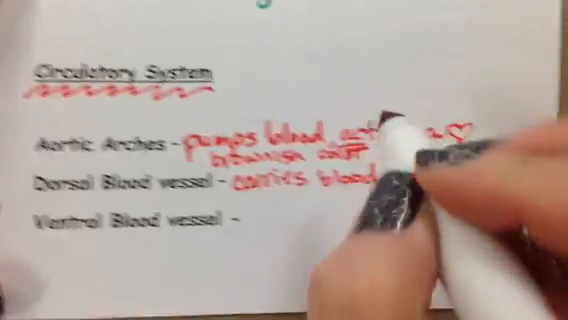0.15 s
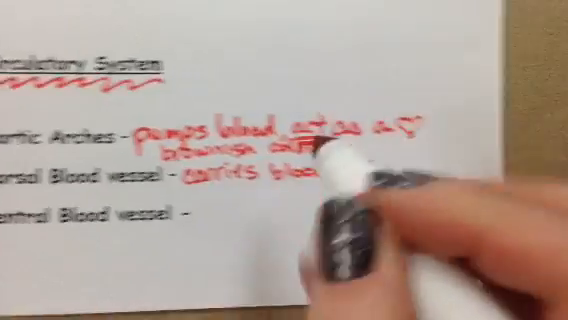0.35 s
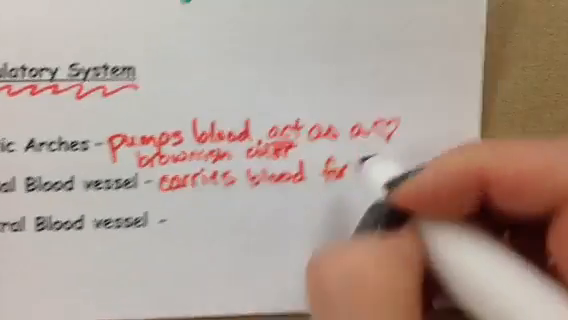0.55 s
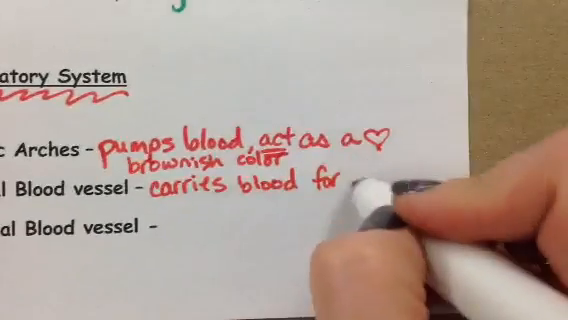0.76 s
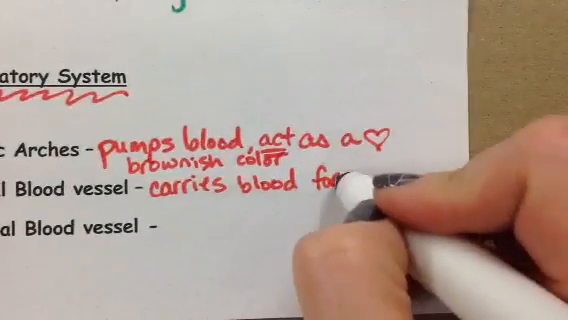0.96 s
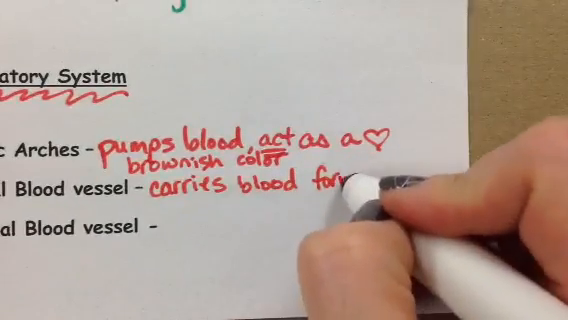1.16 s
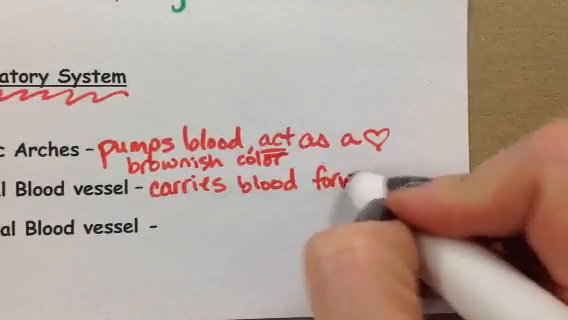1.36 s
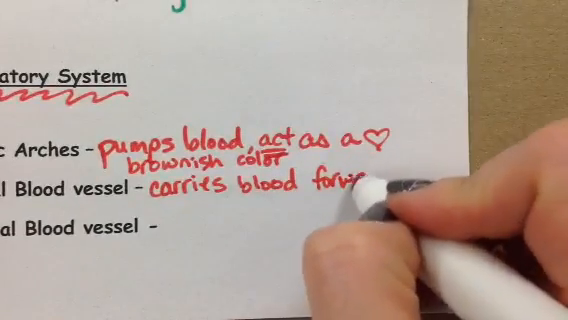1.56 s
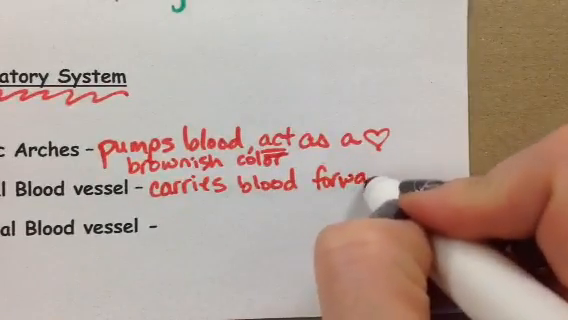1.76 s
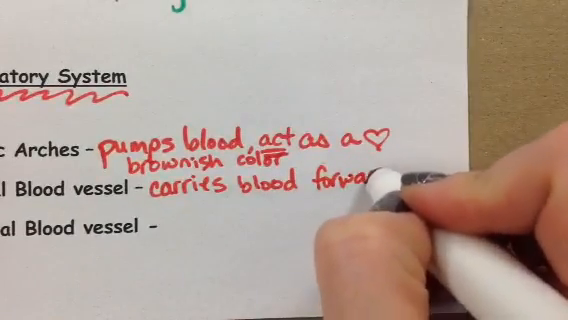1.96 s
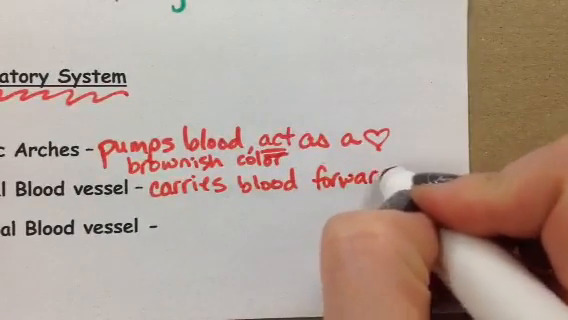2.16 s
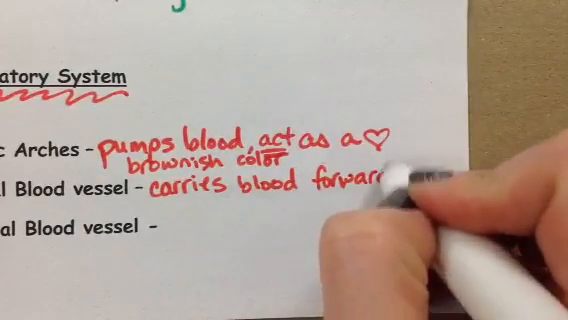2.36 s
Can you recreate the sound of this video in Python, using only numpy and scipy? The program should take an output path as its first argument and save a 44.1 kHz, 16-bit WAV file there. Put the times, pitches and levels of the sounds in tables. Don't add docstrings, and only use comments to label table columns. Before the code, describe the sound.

A felt marker writes on paper in short, dry scratches and small hollow taps, after the sheet is shoved over the desk with rustling and crackles; close phone microphone, quiet room, faint low fan hum.

```python
import sys
import numpy as np
from scipy import signal
from scipy.fft import rfft, irfft
from scipy.io import wavfile
from scipy.ndimage import uniform_filter1d

SR = 44100
rng = np.random.default_rng(int(sys.argv[2]) if len(sys.argv) > 2 else 0)


def materialize(psi):
    bounded = np.clip(np.atleast_2d(psi).T, -1, 1)
    quanta = np.round(bounded * 32767).astype(np.int16)
    wavfile.write(sys.argv[1], SR, quanta)


def natural_amplitude(level_db):
    exponent = np.asarray(level_db, float) / 20
    return 10 ** exponent


N = 110250
T = np.arange(N) / SR


def unit(x):
    return x / np.sqrt(np.mean(x ** 2))


def colour(x, points):
    hz, db = np.array(points).T
    f = np.arange(N // 2 + 1) * SR / N + 1
    curve_db = np.interp(np.log(f), np.log(hz), db, left=-90)
    return unit(irfft(rfft(x) * natural_amplitude(curve_db), N))


def ring(x, hz, width):
    return signal.lfilter(*signal.iirpeak(min(hz, 0.45 * SR), hz / width, SR), x)


def steep_ring(x, hz, width):
    return unit(ring(ring(x, hz, width), hz, 2 * width))


def walk(rate):
    k = int(SR / rate)
    steps = np.repeat(rng.standard_normal(N // k + 1), k)
    return unit(uniform_filter1d(steps, k)[:N])


def body(x, modes, wander_db=2.5):
    return unit(sum(natural_amplitude(db + wander_db * walk(25.4)) * steep_ring(x, hz, width) for hz, width, db in modes))


def grains(rate, scatter_db):
    size = natural_amplitude(scatter_db * rng.exponential(size=N)) * rng.standard_normal(N)
    return unit(size * (rng.random(N) < rate / SR))


def fibres():
    return grains(20000, -0.13)


def swell(at, rise, fall):
    return np.exp(-0.5 * ((T - at) / np.where(T < at, rise, fall)) ** 2)


def knocks(rows):
    out = np.zeros(N + 2048)
    t = T[:2048]
    for at, db, hz, t60 in rows:
        attack = np.minimum(t * hz / 1.42, 1)
        fade = attack * np.exp(-np.log(1000) * t / t60) * (1 - (t / t[-1]) ** 4)
        noise = ring(rng.standard_normal(2048), hz, 0.5 * hz)
        burst = fade * (np.sin(2 * np.pi * hz * t) + (hz / 4000) ** 2 * noise)
        start = int(at * SR)
        out[start:start + 2048] += natural_amplitude(db) * burst / np.abs(burst).max()
    return out[:N]


# f/Hz, level/dB
MAINS_TONES = [(120, -78), (239.5, -72.5), (359.5, -83)]
# f/Hz, width/Hz, level/dB
FAN_BANDS = [(117.7, 32, -81), (153.5, 14, -83), (176.6, 20, -84), (201, 22.6, -70.5), (240, 37, -75),
             (292, 16, -84.5), (621, 42, -82.5)]


def fan():
    tones = sum(natural_amplitude(db + 2) * np.sin(2 * np.pi * (hz * T + rng.random())) for hz, db in MAINS_TONES)
    bands = 0
    for hz, width, db in FAN_BANDS:
        noise = rng.standard_normal(N)
        bands = bands + natural_amplitude(db) * unit(ring(ring(noise, hz, width), hz, width))
    return tones + bands


# f/Hz, level/dB
HISS_COLOUR = [(15, -25), (45, -20), (90, -16), (220, -5), (500, -22.5), (1200, -20), (2500, -26.5),
               (15500, -27)]


def hiss():
    return natural_amplitude(-65) * colour(rng.standard_normal(N), HISS_COLOUR)


# t/s, rub level/dB, sheet ring/dB, desk rumble/dB, brightness/dB
SHEET_PUSHES = [
    [(0.0, -68, -27, -7.5, 1), (0.148, -63, -30, -7.5, 0), (0.19, -52, -16, -13, -3.5),
     (0.235, -47.5, -10, -11, 0.5), (0.322, -45.5, -13.5, -12.5, 0.5), (0.378, -43, -4.5, -10, 8),
     (0.43, -44.5, 1.5, -11, 5), (0.48, -43, 0.5, -11, 1), (0.548, -49, -3, -2.5, -4.5)],
    [(0.58, -42.5, -6, -15, -3.5), (0.64, -41, -2, -10.5, -3.5), (0.69, -44.5, -5.5, -8, -4.5),
     (0.72, -58.5, -3, -12, 5.5), (0.77, -59, -23, -4.5, 4.5), (0.80, -70.5, -8, -4, 0),
     (0.83, -73, -13, -8, 0), (0.846, -66, -8, -9, 5), (0.875, -71, -10, 0, -5.5)],
]
# f/Hz, level/dB
RUB_COLOUR = [(180, -52), (300, -7), (684, -16), (921, -1), (1410, -2.5), (1840, -4), (13500, -7),
              (15400, -8.5)]
# f/Hz, width/Hz, level/dB
SHEET_MODES = [(1690, 170, -5.5), (2340, 240, -0.5), (3330, 330, 0.5), (4140, 480, -2), (4860, 350, -2),
               (5800, 660, -7.5), (7150, 1200, -8), (9050, 1300, -5)]
# f/Hz, width/Hz, level/dB
DESK_MODES = [(275, 97, 0.5), (722, 120, 3), (900, 170, 4.5), (1280, 250, 4.5)]


def sheet():
    s, level, tight, low, bright = np.concatenate(SHEET_PUSHES).T

    def gain(db):
        patchy_db = 0.5 * walk(69.2)
        return natural_amplitude(np.interp(T, s, db, left=-99, right=-99) + patchy_db)

    broad = colour(fibres(), RUB_COLOUR)
    centres = 900 * 1.49 ** np.arange(7)
    broad = broad + sum((natural_amplitude(1.5 * walk(18.6)) - 1) * ring(broad, hz, 0.13 * hz) for hz in centres)
    dull = signal.lfilter(*signal.butter(1, 6000, fs=SR), broad)
    broad = dull + (broad - dull) * natural_amplitude(np.interp(T, s, bright))

    slack_s, slack_pitch, wander_db = 0.55, 0.98, 1.2
    loose = np.clip((T - slack_s) / 0.02, 0, 1)
    slack_modes = [(hz * slack_pitch, width, db) for hz, width, db in SHEET_MODES]
    taut_ring = np.sqrt(1 - loose) * body(fibres(), SHEET_MODES, wander_db)
    slack_ring = np.sqrt(loose) * body(fibres(), slack_modes, wander_db)

    rumble = body(fibres(), DESK_MODES)
    return gain(level) * broad + gain(level + tight) * (taut_ring + slack_ring) + gain(level + low) * rumble


# t/s, peak level/dB, f/Hz, t60/s
PAPER_TICKS = [(0.045, -55, 9300, .003), (0.0529, -52, 9100, 0.0044), (0.0549, -41, 10300, 0.0033),
               (.098, -49.5, 12360, 0.004), (.1195, -44.5, 9300, 0.0048), (0.147, -48, 444, 0.024),
               (.149, -56, 4200, .01), (.155, -41.5, 12500, 0.0043), (0.1676, -42, 1200, 0.0042),
               (0.17, -46, 13000, .006), (.179, -42, 12100, 0.0057), (0.845, -68, 3000, 0.0091),
               (.981, -59, 579.5, 0.015), (0.981, -56.5, 1300, 0.008), (2.4509, -49, 1314, 0.041),
               (1.762, -47, 1300, 0.009), (.058, -53, 201, 0.13), (0.441, -43, 1110, 0.016),
               (0.426, -37, 4940, .02), (0.364, -58.5, 305, 0.041), (0.449, -44, 260, 0.071),
               (0.554, -47.5, 240, 0.06), (1.091, -39.5, 1250, 0.018), (1.1005, -40, 1214, 0.018),
               (1.3564, -48, 1200, 0.014), (1.567, -46, 1200, 0.027), (2.029, -46.5, 5300, 0.006),
               (2.215, -52, 9000, .003), (2.242, -56, 7000, 0.0027)]


def ticks():
    return knocks(PAPER_TICKS)


# t/s, spread/s, f/Hz, width/Hz, level/dB
SINGING_CREASES = [(0.32, 0.0099, 4200, 700, -53), (0.33, 0.0081, 3000, 490, -50),
                   (0.37, .008, 4860, 900, -48), (0.39, 0.011, 4700, 980, -43.5),
                   (0.39, 0.0053, 1300, 400, -45), (0.43, .008, 6900, 1500, -46),
                   (0.41, 0.011, 9800, 2500, -43.5), (.41, 0.0082, 3280, 900, -44),
                   (.43, 0.0095, 5150, 900, -42.5), (.455, 0.018, 10900, 3000, -45),
                   (0.59, 0.013, 740, 400, -52.5), (0.66, 0.016, 7700, 1400, -47.5),
                   (.625, .015, 3200, 340, -49), (.65, .01, 4700, 500, -48), (0.65, .02, 1300, 390, -53.5),
                   (0.47, 0.013, 3350, 280, -51), (0.516, 0.041, 250, 71, -61),
                   (0.473, .03, 2340, 230, -50.5), (2.443, 0.01, 5000, 2200, -60.5),
                   (1.764, 0.0026, 4000, 2700, -60), (.685, 0.022, 2370, 360, -51.5),
                   (0.764, 0.016, 1620, 390, -62.5), (.26, 0.04, 12200, 3300, -53.5)]


def creases():
    rub = fibres()
    return sum(natural_amplitude(db) * swell(at, spread, spread) * steep_ring(rub, hz, width)
               for at, spread, hz, width, db in SINGING_CREASES)


def buckle():
    start_s, length_s, level_db = 0.367, 0.023, -46
    from_hz, to_hz = 740, 5050
    crackle = grains(9000, 3.5)
    out = np.zeros(N)
    for share in np.linspace(0, 1, 9):
        hz = from_hz + (to_hz - from_hz) * share ** 1.65
        passing = swell(start_s + share * length_s, 0.0025, 0.0052)
        out += passing * unit(ring(crackle, hz, 400 + 0.1 * hz))
    return natural_amplitude(level_db) * out


# loudest t/s, rise/s, fall/s, barrel level/dB
TIP_STROKES = [(1.092, 0.0036, 0.028, -50.5), (1.162, 0.0042, .006, -69), (1.188, .01, 0.016, -60.5),
               (1.289, 0.011, 0.0085, -63.5), (1.314, 0.0088, 0.0068, -55.5), (1.361, 0.012, 0.012, -53),
               (1.395, 0.0088, 0.011, -64), (1.529, 0.0025, 0.01, -73), (1.569, 0.014, 0.016, -55.5),
               (1.646, 0.02, 0.021, -56.5), (1.696, 0.0043, 0.014, -59.5), (1.764, 0.0041, 0.022, -54),
               (1.714, 0.0068, 0.0047, -61.5), (1.612, 0.0074, 0.0088, -62), (1.917, 0.0043, 0.01, -63.5),
               (2.0, 0.0057, 0.017, -54.5), (2.022, 0.009, 0.017, -57), (2.072, 0.0042, 0.014, -64),
               (2.292, 0.021, 0.012, -65.5), (2.326, 0.013, 0.0092, -62), (2.356, .012, 0.016, -57.5),
               (2.454, 0.0045, 0.0048, -55)]
# f/Hz, width/Hz, level/dB
BARREL_MODES = [(646, 42, -12.5), (1043, 190, -5), (1230, 274, 8.5), (1580, 340, 1.5), (1920, 560, -6.5),
                (2320, 150, -20)]


def barrel():
    pressure = sum(swell(at, rise, fall) * natural_amplitude(db) for at, rise, fall, db in TIP_STROKES)
    slips = grains(6600, 1.5)
    return pressure * body(slips, BARREL_MODES, wander_db=2.0)


# loudest t/s, rise/s, fall/s, scratch level/dB, airy top/dB (relative to the scratch)
TIP_SWEEPS = [(1.098, 0.0071, 0.021, -56.5, -8), (1.185, 0.0083, 0.017, -57, -2),
              (1.328, 0.013, 0.018, -62.5, -4.5), (1.36, 0.016, 0.017, -70, -7),
              (1.572, 0.0079, .01, -70.5, -1), (1.602, 0.018, 0.015, -58, -2.5),
              (1.64, 0.013, .012, -73, -11), (1.682, 0.015, 0.018, -57.5, -4.5),
              (1.764, 0.0013, 0.0049, -57, -19), (1.788, 0.012, 0.013, -61.5, -10),
              (1.902, 0.0068, .014, -73.5, -12), (2.005, 0.0066, 0.012, -62, -11),
              (2.026, 0.0057, 0.013, -59.5, -7), (2.071, 0.01, 0.012, -69, 0), (2.18, 0.017, .02, -92, 16),
              (2.235, 0.013, .01, -80, 9), (2.292, 0.013, 0.023, -58, -5.5), (2.38, 0.014, 0.018, -61, 2.5),
              (2.415, .012, 0.011, -67.5, -3), (2.443, 0.0092, 0.012, -56, -2)]
# f/Hz, width/Hz, level/dB
SCRATCH_MODES = [(1300, 390, -8), (2350, 330, -1), (2900, 260, -5.5), (3470, 500, -3), (4320, 620, -1),
                 (4950, 330, -5.5), (5570, 900, 1)]
# f/Hz, width/Hz, level/dB
AIR_MODES = [(6050, 780, 1), (6710, 1250, 4.5), (8730, 870, 4), (9440, 980, 1.5), (10570, 1100, -2),
             (12100, 1600, -5), (13900, 1800, -7)]


def scratch():
    sharp = sum(swell(at, rise, fall) * natural_amplitude(db) for at, rise, fall, db, _ in TIP_SWEEPS)
    airy = sum(swell(at, rise, fall) * natural_amplitude(db + top) for at, rise, fall, db, top in TIP_SWEEPS)
    rub = fibres()
    scrape = sharp * body(rub, SCRATCH_MODES, wander_db=0.7) + airy * body(rub, AIR_MODES, wander_db=0.7)
    return scrape - 0.88 * ring(scrape, 7700, 1130)


# t/s, peak level/dB, f/Hz
TIP_JOLTS = [(1.126, -51, 1190), (1.181, -61, 1310), (1.211, -60, 1270), (1.3112, -52, 1230),
             (1.3865, -56, 1140), (1.5287, -60, 1220), (1.561, -52, 1200), (1.574, -51, 1240),
             (1.58, -60, 1520), (1.62, -54, 1230), (1.638, -55, 1220), (1.645, -48, 1215),
             (1.688, -60, 1230), (1.7663, -46, 1240), (1.766, -48, 1580), (1.777, -46, 1300),
             (1.9884, -55, 1180), (1.9951, -46.5, 1200), (2.003, -52, 1300), (2.0658, -58, 1140),
             (2.086, -55.5, 1183), (2.317, -57, 1250), (2.3516, -60, 1160), (2.445, -50, 1386),
             (2.497, -60, 1300)]


def jolts():
    t60_s = 0.026
    return knocks([(at, db, hz, t60_s) for at, db, hz in TIP_JOLTS])


def room(near):
    level_db, t60_s = -17.5, 0.052
    t = T[:SR // 4]
    tail = rng.standard_normal(len(t)) * np.exp(-np.log(1000) * t / t60_s) * (t > 0.004)
    tail = tail / np.sqrt(np.sum(tail ** 2))
    return natural_amplitude(level_db) * signal.fftconvolve(near, tail)[:N]


def scene():
    near = sheet() + ticks() + creases() + buckle() + barrel() + scratch() + jolts()
    mono = near + room(near) + fan() + hiss()
    return np.array([mono, mono])


def band_limit(x):
    return signal.sosfilt(signal.butter(12, 15590, fs=SR, output="sos"), x)


def record(dry):
    low_cut = signal.butter(2, 112, "high", fs=SR, output="sos")
    top_edge = signal.ellip(10, 0.2, 70, 15300, fs=SR, output="sos")
    mix = signal.sosfilt(top_edge, signal.sosfilt(low_cut, dry))
    return band_limit(mix)


dry = scene()
out = record(dry)
materialize(out)
```